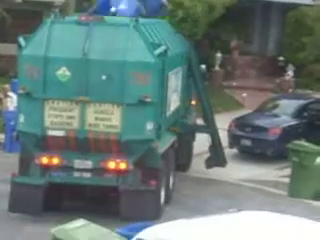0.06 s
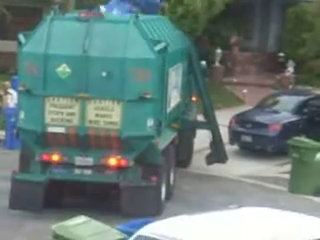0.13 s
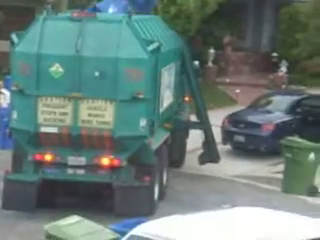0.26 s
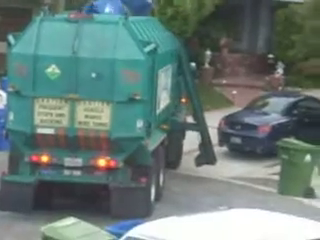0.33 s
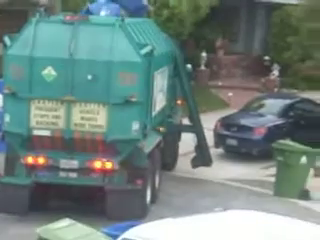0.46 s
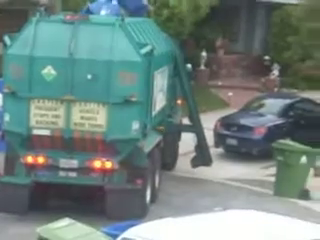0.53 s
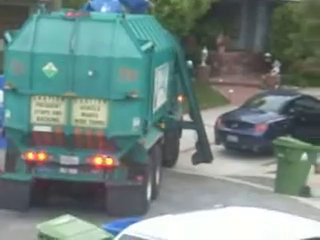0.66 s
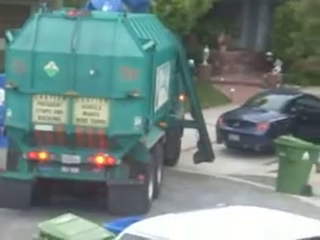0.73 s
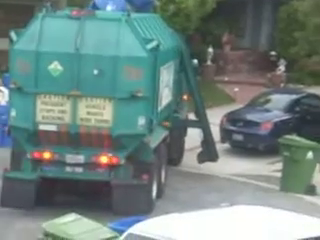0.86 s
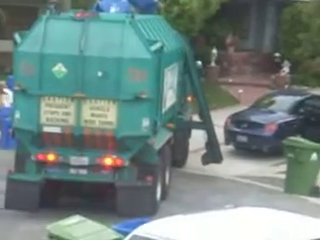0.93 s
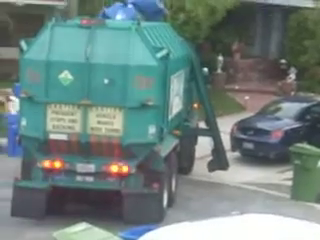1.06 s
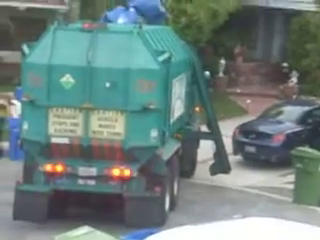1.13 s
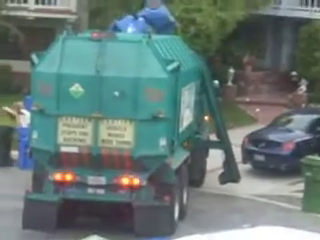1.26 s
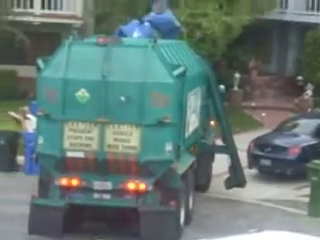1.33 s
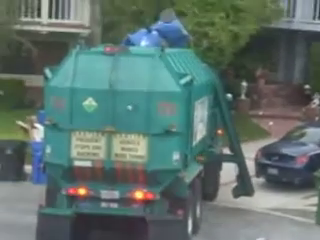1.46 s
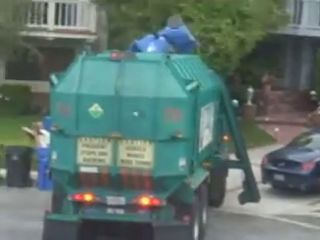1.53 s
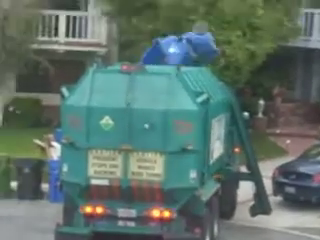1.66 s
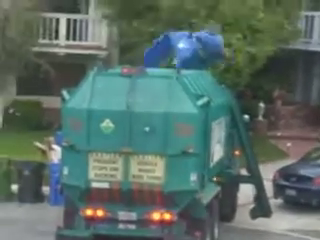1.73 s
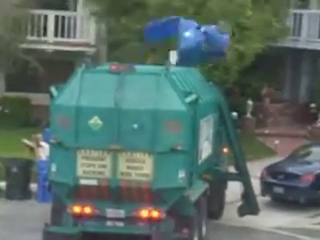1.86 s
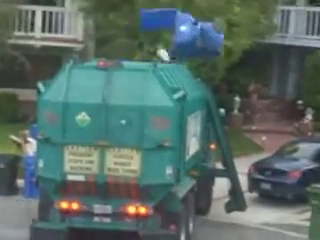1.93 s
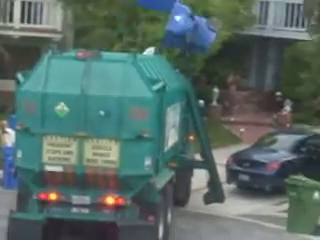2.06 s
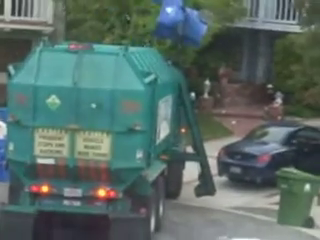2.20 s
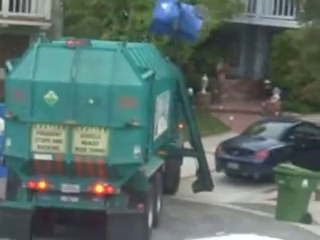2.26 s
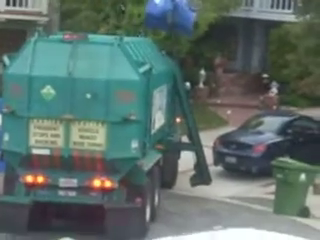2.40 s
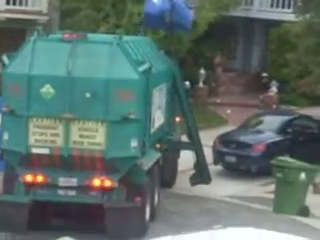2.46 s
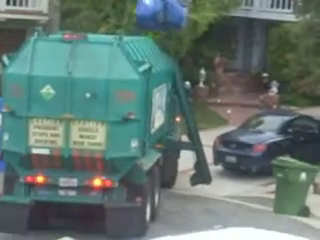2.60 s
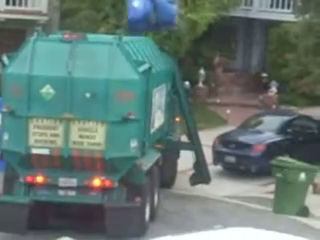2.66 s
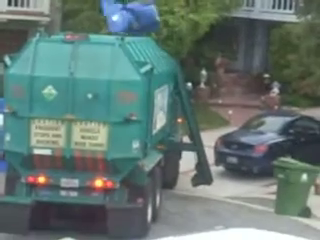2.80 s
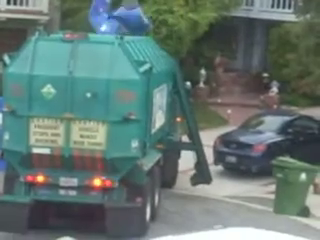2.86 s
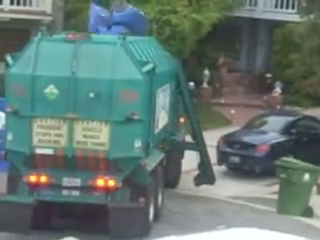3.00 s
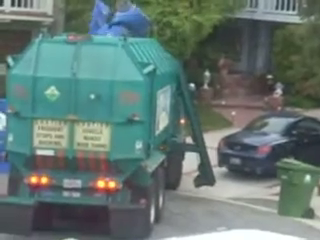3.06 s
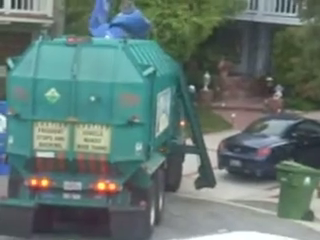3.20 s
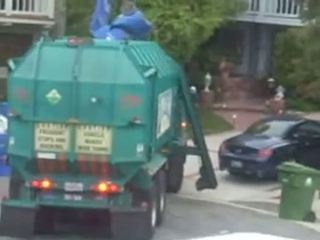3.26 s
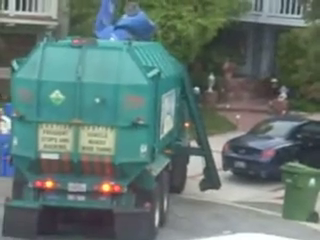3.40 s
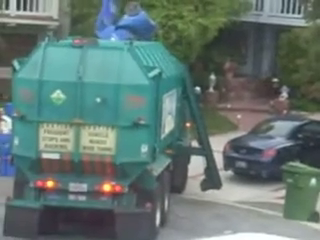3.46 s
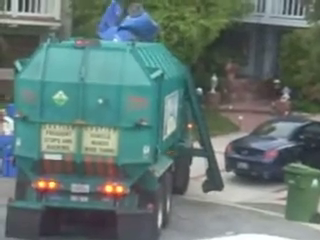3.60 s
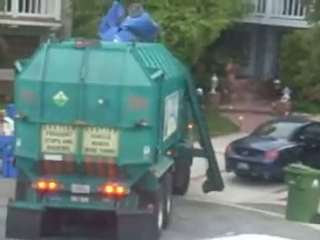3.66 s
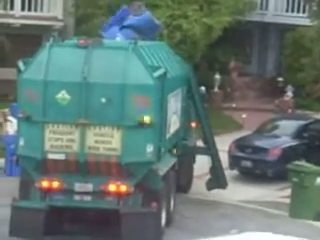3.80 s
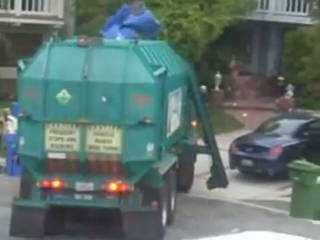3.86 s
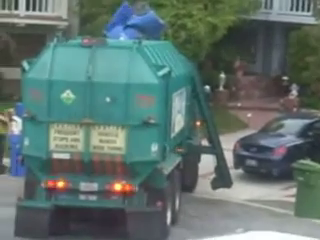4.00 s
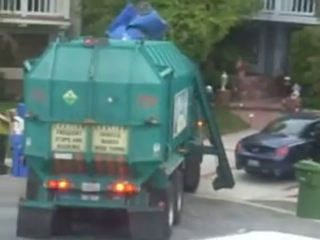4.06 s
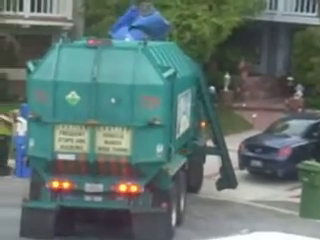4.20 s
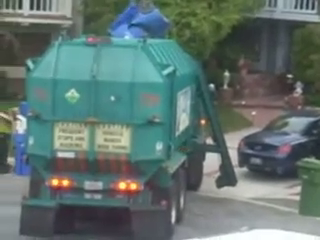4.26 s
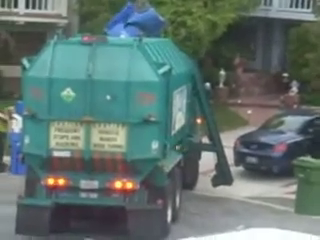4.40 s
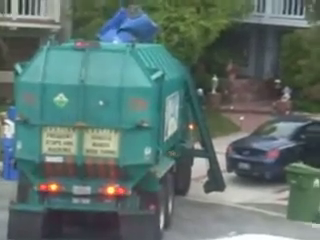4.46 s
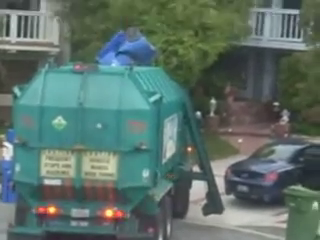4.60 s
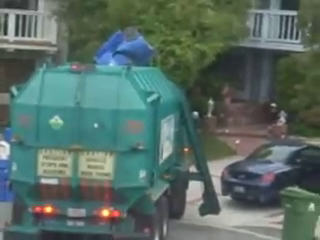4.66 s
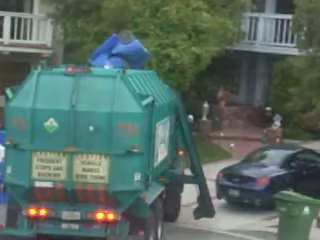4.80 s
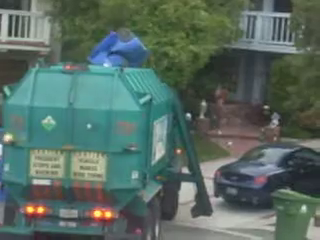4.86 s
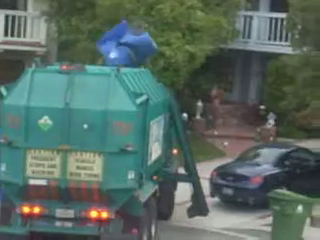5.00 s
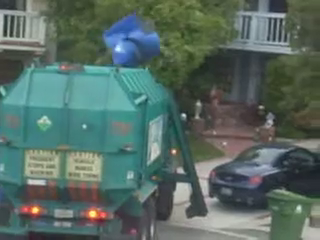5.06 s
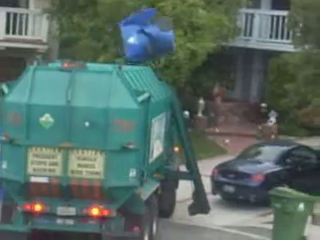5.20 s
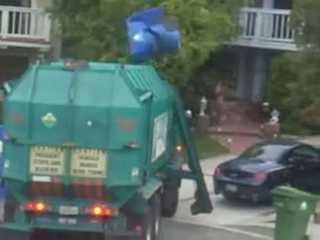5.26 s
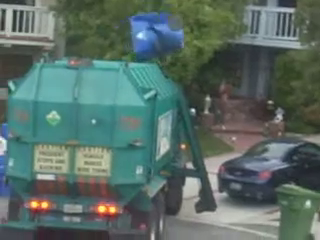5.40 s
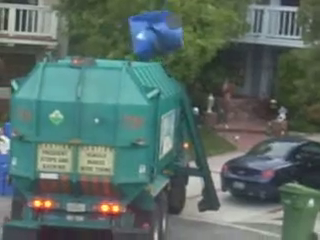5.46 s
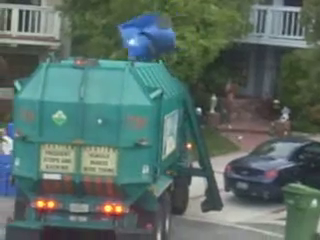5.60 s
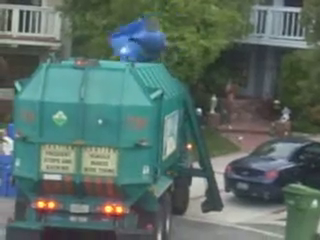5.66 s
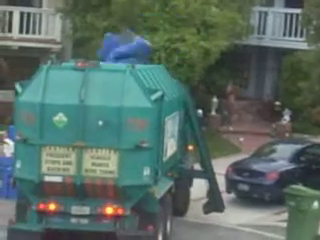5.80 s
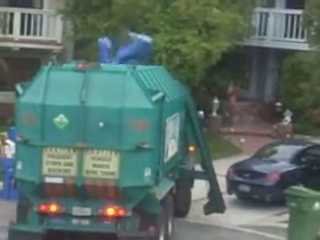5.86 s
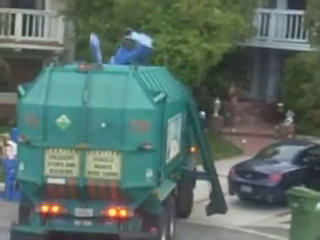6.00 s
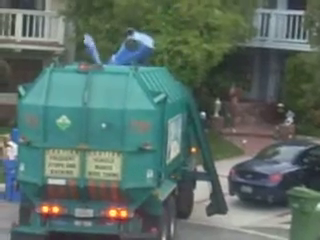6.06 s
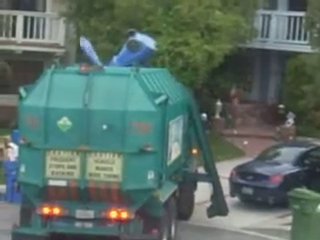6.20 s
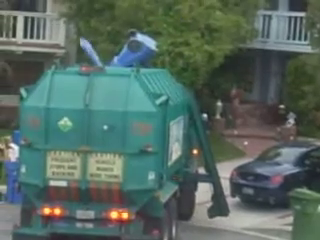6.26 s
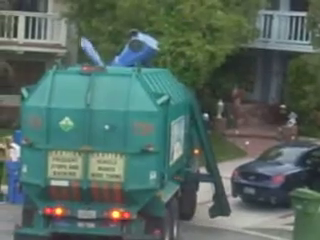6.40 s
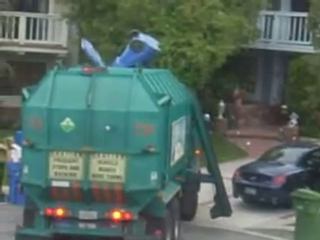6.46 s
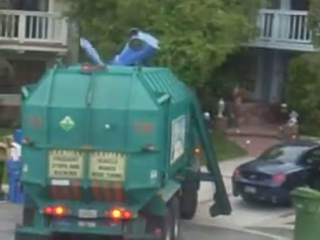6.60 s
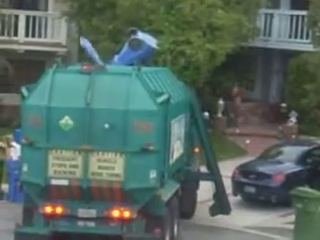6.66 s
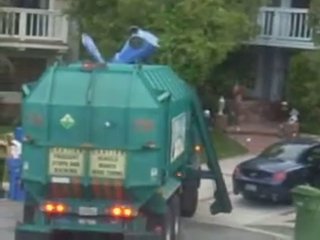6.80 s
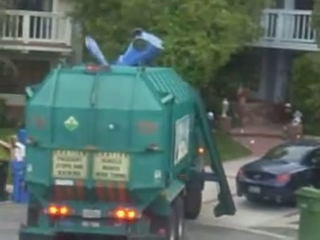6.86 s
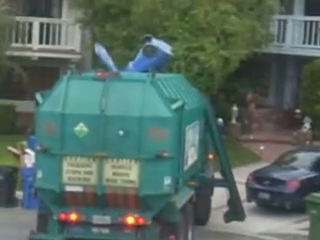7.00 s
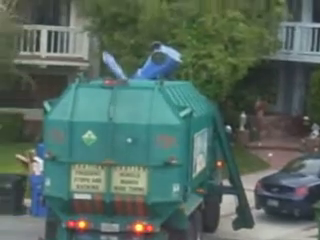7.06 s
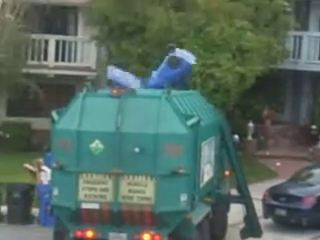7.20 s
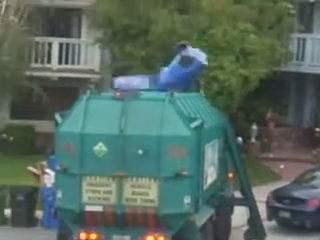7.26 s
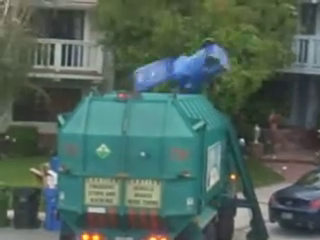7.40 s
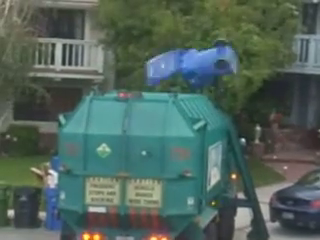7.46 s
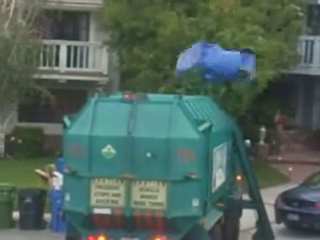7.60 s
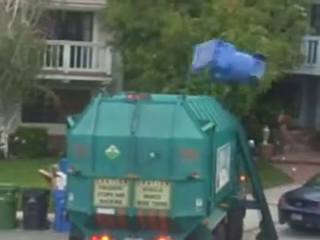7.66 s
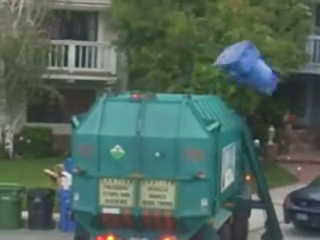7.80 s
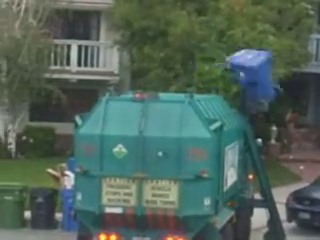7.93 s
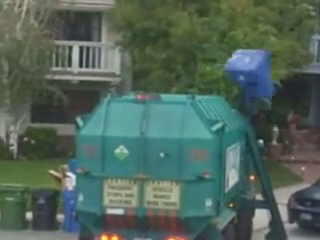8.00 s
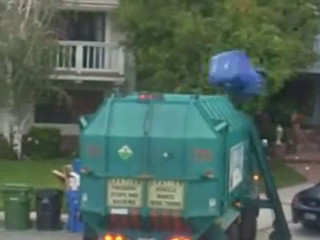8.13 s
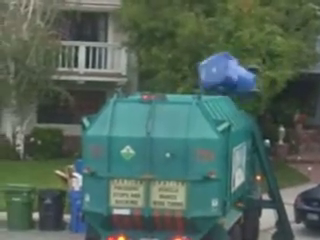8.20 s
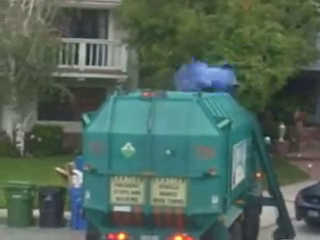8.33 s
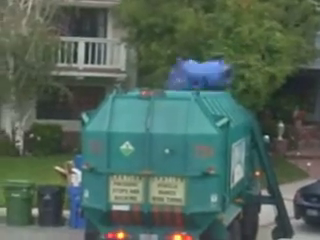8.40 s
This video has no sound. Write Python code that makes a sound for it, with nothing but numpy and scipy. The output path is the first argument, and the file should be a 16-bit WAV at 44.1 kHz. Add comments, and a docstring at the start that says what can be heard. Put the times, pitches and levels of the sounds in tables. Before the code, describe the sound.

Loud crashes and metal clanks of a bin being emptied ring out over a garbage truck's revving diesel and whining hydraulics.

```python
"""A garbage truck's hydraulic arm crashes a bin against the steel hopper and clanks between the blows:
each impact excites panels and modes that decay exponentially. The diesel revs to drive the arm, so the
exhaust drones, the pump whines and the oil hisses with engine speed. A pivot squeals, a valve hums and
house fronts echo down the street; one dry snap sounds close by. A small narrow-band microphone
overloads on the loudest crashes."""
import sys
import numpy as np
from scipy import signal
from scipy.fft import rfft, irfft, next_fast_len
from scipy.io import wavfile
from scipy.ndimage import uniform_filter1d

SR = 44100
rng = np.random.default_rng(int(sys.argv[2]) if len(sys.argv) > 2 else 0)


def generate_wav(signal):
    """Clip the signal to [-1, 1] and save it as 16-bit WAV at the path in sys.argv[1]."""
    frames = np.transpose(np.atleast_2d(signal))
    scaled = np.clip(frames, -1, 1) * 32767
    pcm = np.round(scaled).astype(np.int16)
    wavfile.write(sys.argv[1], SR, pcm)


N = 372634
TIME = np.arange(N) / SR


def from_db(db):
    """Amplitude ratio of a level in decibels."""
    return 10 ** (np.asarray(db) / 20)


def rms_one(x):
    """Normalisation to unit rms."""
    return x / np.sqrt(np.mean(x ** 2) + 1e-20)


def in_time(rows):
    """Linear interpolation: each column after t/s, sample by sample."""
    times, *columns = np.transpose(rows)
    return [np.interp(TIME, times, column) for column in columns]


def gain_at(points, hz):
    """Frequency response: amplitude gain, interpolated in level over log frequency."""
    at, db = np.transpose(points)
    return from_db(np.interp(np.log(hz), np.log(at), db))


def drift(hz):
    """Random modulation: low-pass noise of unit rms with its corner at hz."""
    step, settle = 40, 2000  # samples per point, points discarded
    pole = np.exp(-2 * np.pi * hz * step / SR)
    white = rng.standard_normal(N // step + settle + 2)
    slow = signal.lfilter([1], [1, -2 * pole, pole * pole], white)[settle:]
    return np.interp(np.arange(N) / step, np.arange(len(slow)), rms_one(slow))


def noise(spectrum):
    """Spectral shaping: steady noise of unit rms, falling steeply past the ends of its spectrum."""
    size = next_fast_len(N)
    hz = np.maximum(np.arange(size // 2 + 1) * SR / size, 1)
    skirts = np.minimum(1, np.minimum(hz / spectrum[0][0], spectrum[-1][0] / hz)) ** 4
    white = rfft(rng.standard_normal(size))
    return rms_one(irfft(white * gain_at(spectrum, hz) * skirts, size)[:N])


def ring(x, hz, t60):
    """Damped oscillator: a unit impulse starts a decaying sine of unit amplitude."""
    radius, angle = from_db(-60 / (t60 * SR)), 2 * np.pi * hz / SR
    return signal.lfilter([0, np.sin(angle)], [1, -2 * radius * np.cos(angle), radius ** 2], x + 1e-18)


def resonate(x, hz, t60):
    """Forced resonance: one mode, scaled to keep the rms of a white-noise drive."""
    return ring(x, hz, t60) * 2 * np.sqrt(np.log(1000) / (t60 * SR))


def street(x, wall_hz):
    """Reflection: house fronts add delayed, low-passed copies to the direct sound."""
    # echoes: t/s of delay, level/dB
    echoes = [(.037, -22.5), (0.059, -15.5), (0.095, -12.5), (0.156, -14)]
    dull = signal.sosfilt(signal.butter(1, wall_hz, fs=SR, output="sos"), x)
    return x + sum(from_db(db) * np.interp(TIME - delay, TIME, dull, left=0) for delay, db in echoes)


def scatter(x, t60, wet_db):
    """Multipath interference: reflections off houses and cars make a gliding tone swell and fade."""
    age = TIME[:int(0.4 * SR)]
    paths = rng.standard_normal(len(age)) * from_db(-60 * age / t60)
    reflected = signal.fftconvolve(x, paths / np.linalg.norm(paths))[:N]
    wet = from_db(wet_db)
    return (x + wet * reflected) / np.hypot(1, wet)


def snap(at_s, level_db):
    """Impulse response: heavily damped modes give a dry snap over a short hollow knock."""
    # modes: f/Hz, relative level/dB, t60/s
    modes = [(383, -9, 0.11), (1250, -31, 0.01), (2010, 5.5, 0.0052), (2580, 0, 0.0094),
             (3500, -16, 0.0055)]
    impulse = np.zeros(N)
    impulse[int(at_s * SR)] = from_db(level_db)
    return sum(from_db(db) * ring(impulse, hz, t60) for hz, db, t60 in modes)


def valve():
    """Flow-induced oscillation: oil sings a soft rising tone in a valve as the arm swings back."""
    # glide of the tone: t/s, f/Hz, level/dB
    glide = [(4.9, 218, -68), (5.1, 232, -53.5), (5.4, 248.4, -39.5), (5.6, 264.4, -46.5),
             (5.75, 277, -65.5)]
    hz, db = in_time(glide)
    sounding = (TIME > glide[0][0]) & (TIME < glide[-1][0])
    return sounding * from_db(db + 2.0 * drift(12)) * partial(np.cumsum(hz) / SR, 1)


def pivot(t60):
    """Frictional excitation: dry steel rubs and briefly drives a narrow resonance."""
    # Gaussian swells: t/s of the peak, spread/s, f/Hz, level/dB
    squeals = [(1.5, 0.053, 2980, -37.5), (1.67, 0.078, 2900, -37.5), (5.02, 0.055, 3040, -37),
               (8.019, 0.043, 2955, -30.5), (8.14, 0.057, 2860, -31)]
    sound = np.zeros(N)
    for t, spread, hz, db in squeals:
        swell = from_db(db) * np.exp(-0.5 * ((TIME - t) / spread) ** 2)
        sound += swell * resonate(rng.standard_normal(N), hz, t60)
    return sound


def partial(cycles, order):
    """Phase locking: a sine of unit rms at a multiple of a running cycle count, with random phase."""
    return np.sqrt(2) * np.sin(2 * np.pi * (order * cycles + rng.random()))


def firing_rate(flywheel_s):
    """Rotational inertia: the flywheel smooths changes of engine speed; gives firings per second."""
    # engine speed: t/s, firing f/Hz
    revs = [(0.0, 37.5), (0.33, 37.7), (0.84, 43.6), (1.33, 53.3), (1.71, 39.9), (2.1, 41.6), (2.57, 50.8),
            (3.03, 51.5), (3.59, 66.5), (4.19, 67.2), (4.59, 61.3), (5.18, 41.9), (5.63, 37.7),
            (6.14, 42.4), (6.72, 54.7), (7.34, 56.6), (7.94, 63.8), (8.45, 53.2)]
    return uniform_filter1d(in_time(revs)[0], int(flywheel_s * SR), mode="nearest")


def engine_block(firing_hz, firings, level_db, knock_depth, drone_db, drone_db_per_octave):
    """Forced vibration: the block clatters at each firing and drones on its orders, louder as it revs."""
    # clatter spectrum: f/Hz, relative density level/dB
    clatter_spectrum = [(47, -27), (80, -2.5), (172, -7.5), (244, -8.5), (281, -11.5), (337, -12),
                        (537, -11.5), (570, -9), (827, -13), (1170, -17), (1400, -19), (1820, -41),
                        (3080, -120)]
    # drone of block and drive: multiple of the firing rate, relative level/dB
    orders = [(2.31, -49.5), (2.65, -50), (3.05, -51), (3.63, -44.5), (6.2, -53), (9.1, -55.5)]
    pulsation = 1 + knock_depth * np.cos(2 * np.pi * firings)
    clatter = noise(clatter_spectrum) * pulsation * from_db(level_db + drift(14))
    drone = sum(from_db(db + 2.0 * drift(2)) * partial(firings, order) for order, db in orders)
    octaves = np.log2(firing_hz / np.mean(firing_hz))
    return clatter + drone * from_db(drone_db + drone_db_per_octave * octaves)


def exhaust(firing_hz, firings, flutter_db, rumble_db, surge_db):
    """Acoustic filtering: the silencer shapes the orders of the firing pulses and a turbulent rumble."""
    # engine load, high on throttle and low on the overrun: t/s, relative exhaust level/dB
    load = [(0.0, -31), (1.27, -25.5), (1.46, -36.5), (2.12, -27.5), (2.35, -29), (3.01, -21), (3.57, -19),
            (3.76, -31), (4.37, -26.5), (4.47, -36), (5.14, -39), (5.49, -31.5), (6.4, -28.5),
            (6.91, -23.5), (7.57, -26.5), (7.82, -19), (8.18, -24.5), (8.45, -20)]
    # exhaust orders: multiple of the firing rate, relative level/dB
    orders = [(1 / 2, -5), (2 / 3, -6.5), (5 / 6, -17.5), (1, 0), (1.5, -4.5), (2, -0.69)]
    # silencer response: f/Hz, relative level/dB
    silencer = [(20, -15.5), (33, -8.5), (50, 5), (66, 5), (80, -7.5), (105, -9.5), (140, -6.5)]
    load_db, = in_time(load)
    # the lighter the load, the more unevenly the cylinders fire
    uneven = from_db(2.5 - 0.58 * (load_db - np.mean(load_db)))
    tone, power = 0, 0
    for order, db in orders:
        gain = from_db(db) * gain_at(silencer, order * firing_hz) * (1 if order == 1 else uneven)
        tone += gain * from_db(flutter_db * drift(6)) * partial(firings, order)
        power += gain ** 2
    rumble = from_db(rumble_db) * np.sqrt(uneven) * noise(silencer)
    return from_db(load_db + surge_db * drift(12)) * (tone / np.sqrt(power) + rumble)


def strain(ramp_s):
    """Hydraulic loading: pressure builds, holds and falls with each stroke; gives the extra whine in dB."""
    # strokes of the arm: start t/s, end t/s, added level/dB
    strokes = [(1.55, 1.95, 4), (2.54, 2.92, 4.5), (6.551, 8.3, 2)]
    return sum(db * np.clip(np.minimum(TIME - start, end - TIME) / ramp_s + 0.5, 0, 1)
               for start, end, db in strokes)


def hydraulics(firings, level_db, ripple_depth, hum_db):
    """Flow noise: oil hisses through the valves in pulses while the body's resonances hum along."""
    # hiss spectrum: f/Hz, relative density level/dB
    hiss_spectrum = [(590, -35.5), (1000, -23), (1280, -10), (1580, -2), (1700, -5), (1840, -1.5),
                     (2100, 0), (2290, -1.5), (2870, -0.5), (3430, -8), (3710, -4.5), (4150, -16.5),
                     (5400, -54), (9130, -120)]
    # body resonances: f/Hz, bandwidth/Hz, relative level/dB
    resonances = [(362, 23, -43.5), (640.5, 56, -44.5), (1740, 27, -38.5), (1960, 9.7, -43),
                  (2380, 14, -46), (2900, 29, -48), (3190, 51, -51)]
    pulsation = 1 + ripple_depth * np.cos(2 * np.pi * firings)
    hiss = noise(hiss_spectrum) * pulsation * from_db(level_db + 0.57 * drift(25))
    hum = sum(from_db(db) * resonate(rng.standard_normal(N), hz, t60=np.log(1000) / (np.pi * width))
              for hz, width, db in resonances)
    return hiss + hum * from_db(hum_db + level_db - np.mean(level_db))


def pump(firing_hz, firings, level_db, flutter_db, wobble_cycles, rasp_depth):
    """Gear meshing: tones follow engine speed, modulated by torque ripple and cavitation."""
    # gear whine: multiple of the firing rate, relative level/dB
    orders = [(15.6, -2), (31.2, -3), (32.3, 1), (46.8, -8)]
    # radiation response of the truck body: f/Hz, relative level/dB
    radiation = [(550, 4.5), (640, 6), (720, 0.5), (800, -1.5), (870, -3.5), (1050, -7), (1300, -9),
                 (1600, -6), (1750, -1), (1880, -2.5), (2100, -1.5), (2400, -3.5), (2750, 4.5), (3200, 0)]
    shaken = firings + wobble_cycles * drift(45)
    whine = np.zeros(N)
    for order, db in orders:
        tone = partial(shaken, order) * (1 + rasp_depth * drift(70))
        whine += tone * gain_at(radiation, order * firing_hz) * from_db(db + flutter_db * drift(25))
    return scatter(whine * from_db(level_db), t60=0.71, wet_db=-7.0)


def blow(t, rise, t60):
    """Impact envelope: a linear rise as contact builds, then exponential decay."""
    envelope, start = np.zeros(N), int(t * SR)
    age = TIME[:min(N - start, int(2 * t60 * SR))]
    decay = from_db(-60 * np.maximum(age - rise, 0) / t60)
    envelope[start:start + len(age)] = np.minimum(age / rise, 1) * decay
    return envelope


def linger(energy, tail_db, t60):
    """Reverberation: the hollow hopper stores energy and releases it slowly; gives the amplitude."""
    retained = from_db(-120 / (t60 * SR))
    stored = signal.lfilter([1 - retained], [1, -retained], energy + 1e-18)
    return np.sqrt(energy + from_db(tail_db) ** 2 * stored)


def clanks(bounce_s, bounce_db, tick_count):
    """Light impacts: linkage and lid strike and bounce once, and loose fittings tick at random."""
    # strikes, and likewise the rows returned: t/s, steel level/dB, panel level/dB, t60/s
    strikes = [(0.334, -25.5, -23.5, 0.48), (0.728, -41.5, -31, 0.67), (1.556, -26, -33.5, 0.38),
               (1.768, -25, -44, 0.23), (1.893, -29.5, -40, 0.14), (2.381, -24, -33.5, 0.36),
               (2.435, -26.5, -30, 0.31), (2.539, -30.5, -33.5, 0.98), (2.747, -26, -40.5, 0.19),
               (3.839, -30, -28, .07), (4.878, -28.5, -32, 0.67), (5.172, -20.5, -28.5, .12),
               (5.625, -29.5, -40, 0.16), (6.033, -17.5, -35.5, .1), (7.357, -23, -30.5, 0.26),
               (7.733, -27.5, -26, 0.23), (7.933, -31.5, -27, 0.82), (8.067, -31, -27.5, 1.7)]
    rows = list(strikes)
    for t, steel_db, panel_db, t60 in strikes:
        rows.append((t + bounce_s, steel_db + bounce_db, panel_db + bounce_db, t60))
    for when, force in rng.random((tick_count, 2)):
        force_db = 3 * (2 * force - 1)
        rows.append((when * TIME[-1], -36.5 + force_db, -41 + force_db, 0.27))
    return rows


def slams(rise_s):
    """Multiple impact of bin on hopper: rows of t/s, steel level/dB, panel level/dB, rise/s, t60/s."""
    # crashes: t/s, steel level/dB, panel level/dB, t60/s, touch lead/s, relative touch level/dB,
    # load lag/s, rebound lag/s, relative rebound level/dB
    crashes = [(.146, -14, -17.5, 0.33, 0.021, -8, 0.022, 0.11, -5),
               (2.053, -20.5, -22.5, 0.19, 0.084, -15, 0.0061, 0.078, -19.5),
               (2.914, -9.5, -14.5, 0.33, 0.058, -11.5, .02, 0.214, -6.5),
               (5.776, -15.5, -18, 0.64, 0.05, -14.5, 0.019, 0.241, -8.5),
               (8.344, -10, -13, 0.52, 0.096, -10, 0.036, .25, -7)]
    rows = []
    for t, steel_db, panel_db, t60, lead, touch_db, load_lag, rebound_lag, rebound_db in crashes:
        arm_touches = (t - lead, steel_db + touch_db, panel_db + touch_db, 0.42 * lead, t60)
        bin_hits = (t, steel_db, panel_db, rise_s, t60)
        load_follows = (t + load_lag, steel_db - 2, panel_db - 2, rise_s, t60)
        bin_rebounds = (t + rebound_lag, steel_db + rebound_db, panel_db + rebound_db - 3, 0.012, 0.38)
        rows += [arm_touches, bin_hits, load_follows, bin_rebounds]
    return [row for row in rows if row[0] < TIME[-1]]


def arm_and_bin(clank_rise_s, crack_db, crack_t60, panel_t60_ratio, rattle_db, modes_db):
    """Impact excitation: rattling contacts drive bright steel, booming panels and the hopper's modes."""
    # spectra of steel parts, body panels and the brighter linkage: f/Hz, relative density level/dB
    steel_spectrum = [(590, -29.5), (1000, -23.5), (1110, -25.5), (1400, -7.5), (1610, -6), (1980, 0),
                      (2400, -3), (2830, 0.5), (3040, -2), (3800, -0.5), (4150, -11), (5400, -40),
                      (9130, -120)]
    panel_spectrum = [(65, -37.5), (110, -16), (170, -3), (225, -6), (302, -4), (355, 4.5), (439, -6.5),
                      (483, 3), (585, -0.5), (658, -0.5), (796, -0.5), (1030, -11), (1300, -9.5),
                      (1400, -6.5), (1820, -33.5), (3080, -120)]
    link_spectrum = [(900, -19.5), (1400, -6), (2000, -2), (2500, 3), (3000, 2), (3800, 2.5), (4300, -13)]
    # modes of the hopper: f/Hz, relative level/dB, t60/s
    modes = [(351.8, -9.5, 0.35), (501, -12, 0.66), (555, -7, 0.12), (605, -3.5, 0.25), (690, -11.5, 0.19),
             (784.4, -7, 0.053), (878, -4.5, 0.27), (1370, -16.5, .12), (1677, -17, .15),
             (2040, -11, 0.054), (2593, -10, 0.048), (2757, -10, 0.13), (3104, -9, 0.052),
             (3310, -6.5, 0.1), (3410, -19.5, .12), (3810, -9.5, 0.074)]
    # incoherent blows add in energy
    steel_energy, panel_energy, link_energy = np.zeros((3, N))
    for t, steel_db, panel_db, rise, t60 in slams(rise_s=0.007):
        steel_energy += (from_db(steel_db) * blow(t, rise, t60)) ** 2
        panel_energy += (from_db(panel_db) * blow(t, rise, t60 * panel_t60_ratio)) ** 2
    for t, steel_db, panel_db, t60 in clanks(bounce_s=0.027, bounce_db=-9.5, tick_count=16):
        crack = from_db(crack_db) * blow(t, clank_rise_s, crack_t60)
        envelope = crack + blow(t, clank_rise_s, t60)
        link_energy += (from_db(steel_db) * envelope) ** 2
        panel_energy += (from_db(panel_db) * envelope) ** 2
    steel = linger(steel_energy, tail_db=-6.5, t60=0.75)
    panel = linger(panel_energy, tail_db=-2.0, t60=1.15)
    link = linger(link_energy, tail_db=-10.0, t60=0.46)
    rattle = rms_one(from_db(rattle_db * drift(390)))
    contacts = rattle * rng.standard_normal(N)
    # the panels feed the low modes, the steel parts the high ones
    ringing = sum(from_db(db) * resonate(contacts * (panel if hz < 1000 else steel + link), hz, t60)
                  for hz, db, t60 in modes)
    burst = steel * noise(steel_spectrum) + panel * noise(panel_spectrum) + link * noise(link_spectrum)
    return rattle * burst + from_db(modes_db) * ringing


def scene():
    """Superposition: engine speed drives exhaust, block, oil and pump; the arm crashes on top."""
    firing_hz = firing_rate(flywheel_s=0.17)
    firings = np.cumsum(firing_hz * (1 + 0.003 * drift(5))) / SR
    octaves = np.log2(firing_hz / 50)  # above the working rate of 50 Hz
    strain_db = strain(ramp_s=0.15)
    block_db = -35 + 2 * octaves
    hiss_db = -34 + 5.5 * octaves - 0.34 * strain_db  # under strain, oil leaves the bypass for the rams
    whine_db = -42.5 + 9.5 * octaves + strain_db
    impacts = arm_and_bin(clank_rise_s=0.0012, crack_db=-8.0, crack_t60=0.038,
                          panel_t60_ratio=1.12, rattle_db=1.5, modes_db=-10.5)
    block = engine_block(firing_hz, firings, block_db, knock_depth=0.088,
                         drone_db=-2.0, drone_db_per_octave=8.5)
    oil = hydraulics(firings, hiss_db, ripple_depth=0.079, hum_db=-5.5)
    whine = pump(firing_hz, firings, whine_db, flutter_db=3.0, wobble_cycles=0.0029, rasp_depth=0.69)
    truck = block + oil + whine + valve() + pivot(t60=0.067) + impacts
    drone = from_db(-1.5) * exhaust(firing_hz, firings, flutter_db=2.4, rumble_db=-15.5, surge_db=0.87)
    return (street(truck, wall_hz=3000) + drone + snap(at_s=5.4275, level_db=-13.5))[None]


def record(dry):
    """Band limiting and saturation: the microphone passes a narrow band and clips the loudest peaks."""
    mic_stop_hz, clip_level, output_stop_hz = 4800, 0.73, 16450
    narrow = signal.sosfilt(signal.cheby2(20, 80, mic_stop_hz, fs=SR, output="sos"), dry)
    clipped = np.clip(narrow, -clip_level, clip_level)
    return signal.sosfilt(signal.cheby2(14, 70, output_stop_hz, fs=SR, output="sos"), clipped)


dry = scene()
out = record(dry)
generate_wav(out)
```